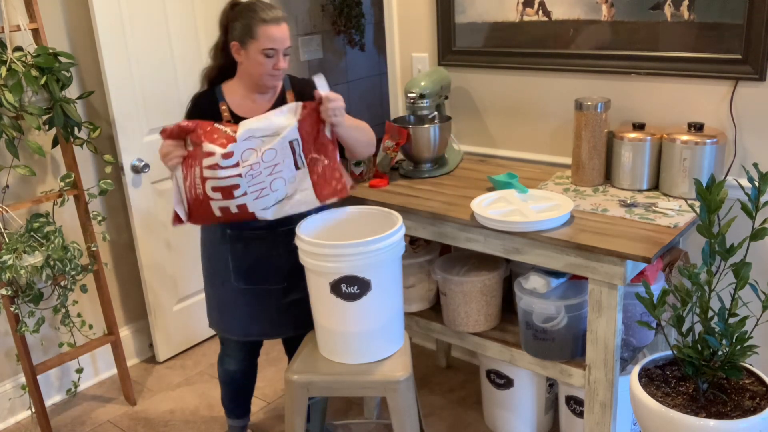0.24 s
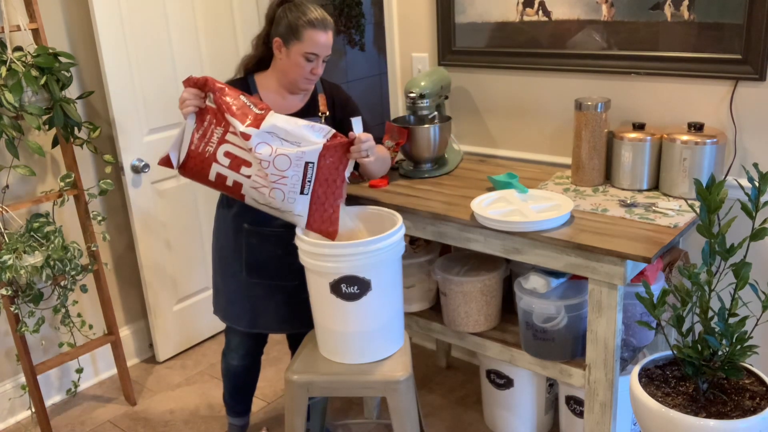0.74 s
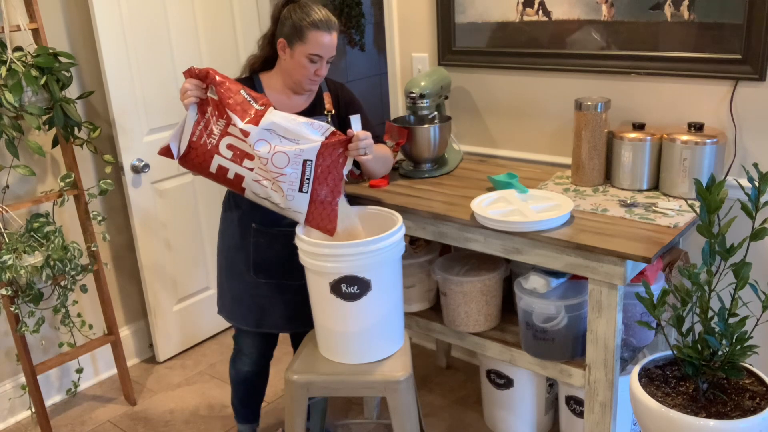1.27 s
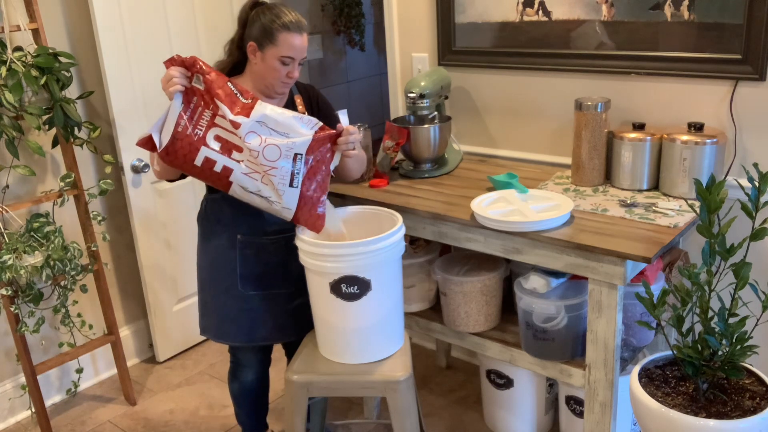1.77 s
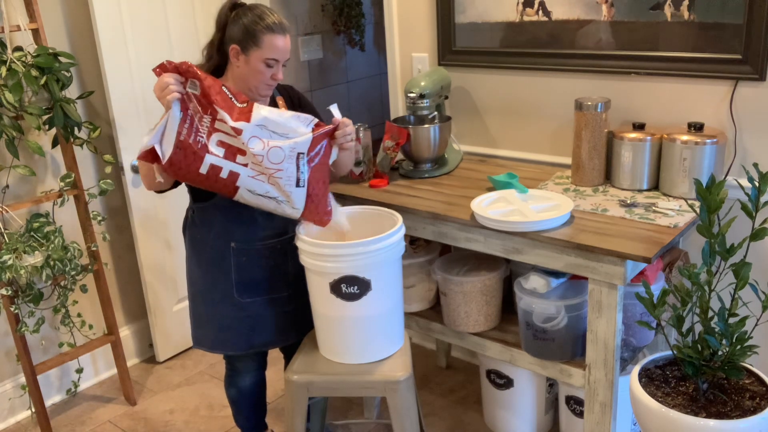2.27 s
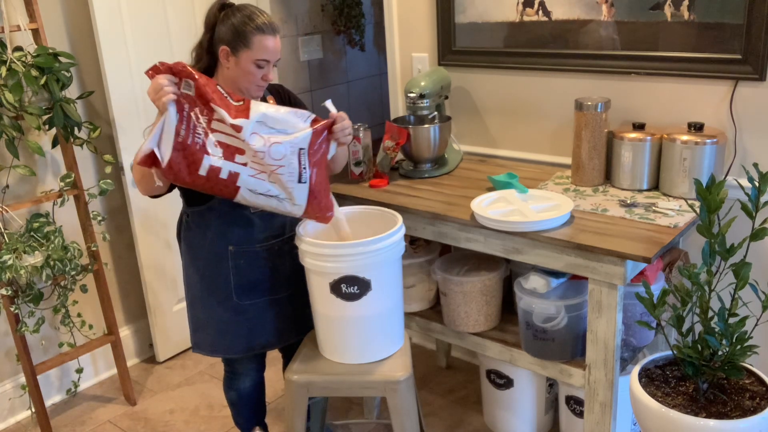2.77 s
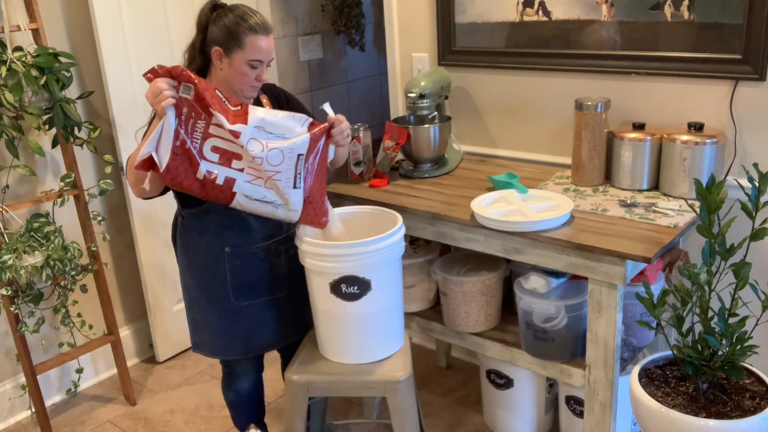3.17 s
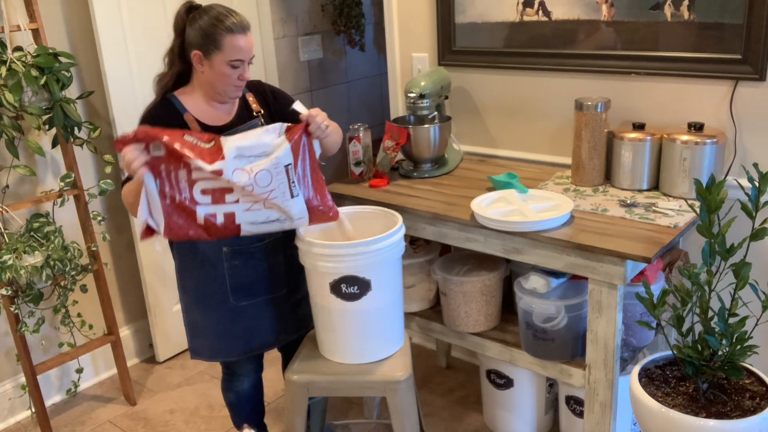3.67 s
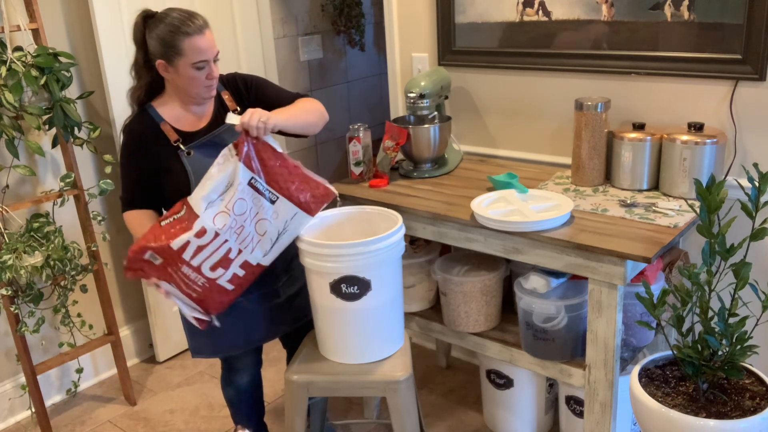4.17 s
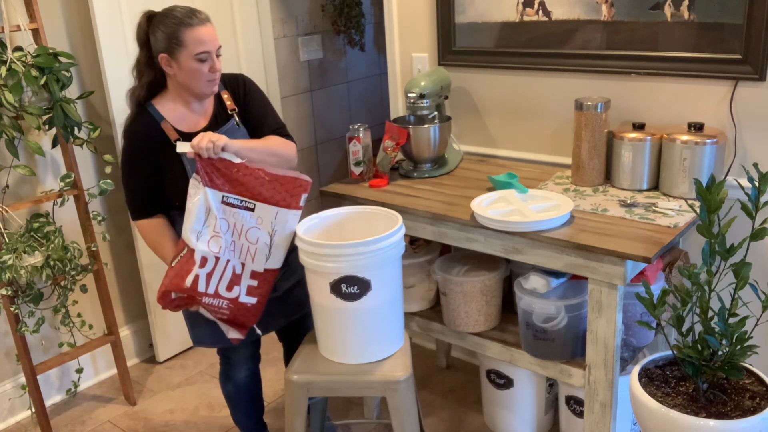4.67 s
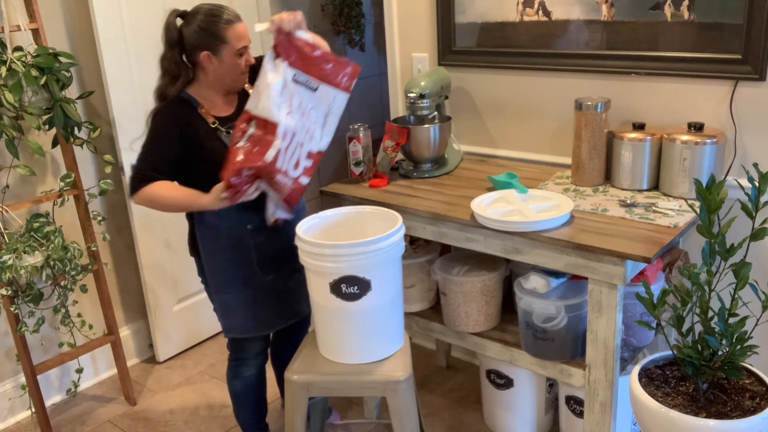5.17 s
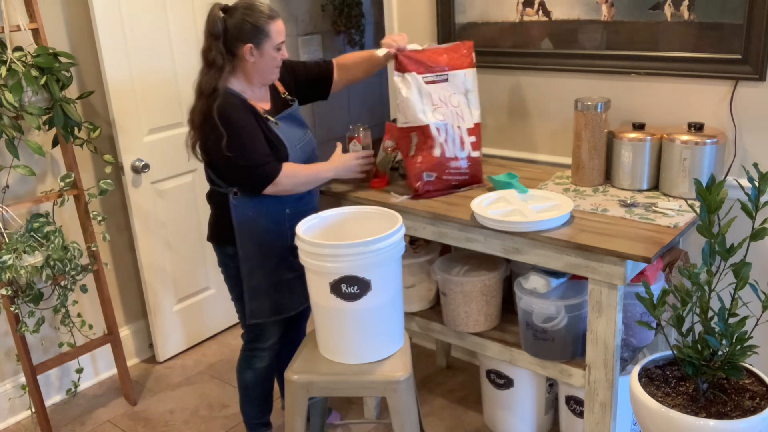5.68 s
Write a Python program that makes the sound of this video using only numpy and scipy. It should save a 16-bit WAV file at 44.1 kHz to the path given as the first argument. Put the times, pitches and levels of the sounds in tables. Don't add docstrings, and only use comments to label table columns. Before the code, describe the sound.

Over a soft low hum of kitchen appliances, a big bag of dry rice shifts with grainy slumps and crinkles. Rice bursts into a bucket with a hollow, ringing hiss that fades, followed by repeated shakes about four per second. Then the bag is righted with strong rustling and sharp plastic snaps, moves with faint creaks and crackles, and lands softly on a counter. Close, fairly dry stereo.

```python
import sys
import numpy as np
from scipy import signal
from scipy.fft import rfft, irfft, next_fast_len
from scipy.io import wavfile

SR = 44100
rng = np.random.default_rng(int(sys.argv[2]) if len(sys.argv) > 2 else 0)


def ratio(d):
    e = np.asarray(d, float) / 20
    return 10 ** e


def generate_wav(sig):
    pcm = np.round(np.clip(np.atleast_2d(sig).T, -1, 1) * 32767).astype(np.int16)
    wavfile.write(sys.argv[1], SR, pcm)


N = 261204

# (time [s], hiss level [dB])
FLOW = [(0, -65), (.685, -56), (.708, -36), (.75, -34.5), (.93, -37.5), (1.126, -41.5), (1.18, -46),
        (1.28, -45), (1.41, -49.5), (1.69, -53), (1.96, -51.5), (2.75, -52.5), (3.25, -53), (3.5, -44),
        (3.63, -43), (3.72, -54.5), (3.8, -70), (5.92, -70)]


def from_db(db):
    return np.exp(np.asarray(db) * np.log(10) / 20)


def rms_one(x):
    return x / np.sqrt(np.mean(x ** 2) + 1e-20)


def in_time(rows):
    s, *columns = np.transpose(rows)
    return [np.interp(np.arange(N) / SR, s, column) for column in columns]


def at_hz(points, hz):
    table_hz, values = np.transpose(points)
    return np.interp(np.log(hz), np.log(table_hz), values)


def flicker(depth_db, rate):
    step = 64
    r = np.exp(-2 * np.pi * rate * step / SR)
    noise = rng.standard_normal(N // step + 1002)
    slow = signal.lfilter([1], [1, -2 * r, r * r], noise)[1000:]
    return np.interp(np.arange(N) / step, np.arange(len(slow)), from_db(depth_db * rms_one(slow)))


def resonance(x, hz, width_hz):
    r = np.exp(-np.pi * width_hz / SR)
    poles = [1, -2 * r * np.cos(2 * np.pi * hz / SR), r * r]
    return signal.lfilter([(1 - r * r) / 2, 0, (r * r - 1) / 2], poles, x)


def grains(per_s, spread_db, clump_db):
    draw = rng.random((2, N))
    loudness_db = spread_db * np.minimum(rng.exponential(1, N), 5)
    sizes = from_db(loudness_db) * rng.standard_normal(N)
    born = draw < per_s * flicker(clump_db, 25) / SR
    return rms_one(np.array([sizes, sizes[::-1]]) * born + 1e-9)


def coloured(white, spectrum, patchy_db, patch_rate):
    edges = 25 * 2 ** np.arange(0, 9.6, .5)
    out = 0
    for k, (low, high) in enumerate(zip(edges, edges[1:])):
        if spectrum[0][0] < high and low < spectrum[-1][0]:
            band = signal.sosfilt(signal.butter(2, [low, high], "band", fs=SR, output="sos"), white)
            gain = from_db(at_hz(spectrum, np.sqrt(low * high)))
            gain = gain * (-1) ** k
            out = out + gain * flicker(patchy_db, patch_rate) * flicker(1.17, 28.0) * band
    return rms_one(out)


def layer(level_db, spectrum, per_s, spread_db, clump_db, patchy_db):
    return from_db(level_db) * coloured(grains(per_s, spread_db, clump_db), spectrum, patchy_db, 8.5)


def swells(peak_s, level_db, rise_s, fall_s, hold_s, under_db):
    t, power = np.arange(0, N + 32, 32) / SR, 1e-12
    for s, db, rise, fall, hold in np.broadcast(peak_s, level_db, rise_s, fall_s, hold_s):
        before = np.maximum(s - t, 0) / max(rise, 1e-3)
        after = np.maximum(t - s - hold, 0) / max(fall, 1e-3)
        power = power + from_db(2 * (db - 10 * (before + after)))
    return 10 * np.log10(np.interp(np.arange(N) / SR, t, power) + from_db(2 * under_db))


def handling():
    # (peak [s], rustle [dB], 10 dB rise [s], 10 dB fall [s], spilled grains [dB])
    shakes = [
        (1.508, -38, 0.02, 0.07, -47),
        (1.772, -37.5, .045, 0.09, -40.5),
        (2.033, -34, .04, .09, -40.5),
        (2.279, -34, .035, .2, -42.5),
        (2.549, -32.5, 0.06, 0.1, -43.5),
        (2.802, -29, .018, .11, -39),
        (3.063, -29.5, .022, 0.1, -39.5),
        (3.318, -29, .022, 0.12, -41),
    ]
    # (peak [s], slumping rice [dB], 10 dB rise [s], 10 dB fall [s], body over slump [dB])
    shifts_tipped = [(0.0, -27, .01, 0.04, -11), (.04, -34.5, 0.4, .1, -3), (.2, -36.5, .08, .1, -3.5),
                     (.3, -32.5, .07, .25, -1), (.53, -26.5, 0.14, 0.11, -6.5), (.64, -34, 0.02, 0.08, -2),
                     (.76, -41, .05, .25, -6), (1.2, -46.5, -0.2, .08, -2), (1.52, -41, 0, 0.05, -5),
                     (1.6, -54, 0, 0.1, 6.5), (1.702, -37, .002, .015, -14), (2.185, -43, 0.1, .03, -6),
                     (2.47, -39.5, .1, .04, -9), (2.671, -40.5, 0.12, 0.1, -4),
                     (2.875, -37, .015, .03, -14), (2.986, -37, .03, 0, -11), (3.122, -35, 0, 0.05, -10),
                     (3.17, -41, 0, 0.14, -9), (3.5, -44.5, 0.26, -0.1, -1.5)]
    shifts_righted = [(3.728, -34, .002, .01, -11), (3.762, -32, 0, 0.1, -8), (3.82, -26, .03, 0.15, -3),
                      (4.15, -27, 0.02, 0.06, -11.5), (4.18, -24, 0.0626, 0.13, -10),
                      (4.345, -33.5, 0.04, .08, -5), (4.55, -41, 0.35, 0.4, -6.5),
                      (4.703, -36, 0.08, .15, -2), (4.78, -35.5, 0.09, .03, 3),
                      (4.869, -39.5, 0.07, .07, -.1), (4.99, -39, 0.13, .04, -11),
                      (5.03, -40.5, .02, .02, 3), (5.08, -40.5, .025, 0.05, 5.5), (5.1, -41, 0.1, .04, -9),
                      (5.18, -42, .12, .045, -0.5), (5.21, -43, 0.15, .04, -7), (5.26, -45, 0.2, .02, -11),
                      (5.32, -46, 0.4, 0, -20), (5.405, -47, .02, 0.5, -18), (5.455, -36.5, .018, 0.3, -4),
                      (5.525, -35, .05, .015, -8), (5.555, -25.5, 0.0064, .05, -13),
                      (5.59, -39, 0.03, .04, -1), (5.695, -30, .1, .06, -1), (5.76, -38, .04, .1, -1),
                      (5.839, -36, 0.03, 0.2, -2.5)]
    # (peak [s], rustle [dB], 10 dB rise [s], 10 dB fall [s], loose grains over rustle [dB])
    grips = [(0.0, -29, .01, .015, -6), (.04, -32, 0.7, .13, -14), (.3, -33.5, 0.2, 0.5, -17),
             (.53, -32.5, 0.35, 0.28, -15), (.66, -37, 0.1, 0.04, -11), (1.701, -37, .002, .012, -12),
             (2.878, -35.5, 0.03, .03, -12), (2.984, -38, .004, 0.05, -12), (3.122, -35.5, 0, 0.06, -15),
             (3.762, -33.5, .004, .05, -12), (3.827, -27, .05, 0.11, -13.5), (4.06, -37.5, 0.2, 0.16, -8),
             (4.173, -24.5, 0.065, .15, -19), (4.333, -28, 0.01, .025, -10), (4.37, -30.5, .01, .05, -8),
             (4.47, -34.5, 0.23, 0.57, -18), (4.7, -38, 0.25, 0.1, -10.5), (4.949, -44, -0.13, 0.1, -7),
             (4.99, -43, -0.1, 0.06, -25), (5.08, -40.5, .04, .09, -11), (5.208, -37.5, -0.02, 0.05, -3),
             (5.258, -44, -0.1, 0.1, -16), (5.284, -34.5, .003, .018, -14), (5.33, -46.5, -0.1, .1, -17),
             (5.41, -46, -0.2, .03, -20), (5.452, -37, -0.02, .3, -16), (5.52, -34, .04, .02, -18),
             (5.555, -29, .004, .05, -18), (5.66, -26.5, .055, 0.09, -10.5), (5.839, -33, 0.03, .05, -15)]
    spill_fall = 0.68

    flow_db, = in_time(FLOW)
    s, sheet_db, rise, fall, spill_db = np.transpose(shakes)
    load_db = -38.5 + 0.8 * (sheet_db + 32.5)
    hold = 0.61 * fall
    body_db = swells(s + 0.011, load_db - 7.5, rise, fall, hold, flow_db - 14)
    slump_db = swells(s - 0.0093, load_db, rise, 0.64 * fall, hold, flow_db - 6)
    rustle_db = swells(s, sheet_db, rise, fall, 0, flow_db + 2.5)
    hiss_db = swells(s, spill_db, rise, spill_fall * fall, 0, flow_db)

    s, load_db, rise, fall, deep_db = np.vstack([shifts_tipped, shifts_righted]).T
    body_db = swells(s, load_db + deep_db, rise, fall, 0, body_db)
    slump_db = swells(s, load_db, rise, fall, 0, slump_db)

    s, sheet_db, rise, fall, loose_db = np.transpose(grips)
    rustle_db = swells(s, sheet_db, rise, fall, 0, rustle_db)
    hiss_db = swells(s, sheet_db + loose_db, rise, spill_fall * fall, 0, hiss_db)
    return body_db, slump_db, rustle_db, hiss_db


def rice_and_sack():
    # (frequency [Hz], level [dB per Hz])
    body_spectrum = [(110, -16), (170, -10), (240, -3.5), (310, 1.5), (400, -2.5), (600, -16.5)]
    slump_spectrum = [(250, -23), (450, -5), (800, 0.5), (1200, -3.5), (1700, -2), (3000, -26)]
    rustle_spectrum = [(900, -12), (1600, 0), (2400, -5.5), (3100, -1.5), (5000, -10), (7000, -10.5),
                       (11000, -23)]
    hiss_spectrum = [(2500, -9.5), (5000, -5), (7500, -2), (9000, -2), (11500, -2), (14000, -1.5),
                     (16500, 0.5)]
    # (frequency [Hz], width [Hz], gain [dB])
    sack_modes = [(242, 17, -7.5), (315, 18, -5.5), (522, 29, -7), (804, 26, -6), (1208, 52, -9),
                  (1485, 40, -9)]

    body_db, slump_db, rustle_db, hiss_db = handling()
    body = layer(body_db + 0.2, body_spectrum, per_s=4000, spread_db=1.6, clump_db=1.07, patchy_db=1.5)
    slump = layer(slump_db + 1.95, slump_spectrum, per_s=8000, spread_db=1.6, clump_db=.9, patchy_db=2.1)
    rustle = layer(rustle_db + 2.0, rustle_spectrum, per_s=8000, spread_db=2.4, clump_db=.9, patchy_db=1.5)
    hiss = layer(hiss_db + 6.0, hiss_spectrum, per_s=19000, spread_db=1.5, clump_db=2.0, patchy_db=2.1)
    sack = body + slump + rustle
    rung = 0
    for hz, width_hz, gain_db in sack_modes:
        rung = rung + from_db(gain_db) * flicker(3.3, 4.7) * resonance(sack, hz, width_hz)
    return sack + rung + hiss


def kitchen_air():
    # (frequency [Hz], level [dB per Hz])
    floor_spectrum = [(25, -17), (38, -9), (70, -1.5), (100, -3), (200, -14), (500, -19), (2000, -14.5),
                      (5000, -20), (8000, -37), (16000, -35)]
    return from_db(-46) * coloured(rng.standard_normal((2, N)), floor_spectrum, 1.4, 2.5)


def hum():
    # (time [s], frequency [Hz], level [dB])
    compressor = [(0, 76, -41.5), (1.5, 76, -42), (2.7, 76, -43.5), (3.3, 76, -50), (4.2, 75.8, -56),
                  (5.0, 75.8, -47.5), (5.92, 75.5, -53)]
    # (time [s], frequency [Hz], level [dB], second harmonic [dB])
    fan = [(0, 57, -52, -55), (1, 57.5, -50, -54), (2, 59, -57, -65), (2.9, 60.5, -46, -56),
           (3.5, 62.5, -46.5, -60), (4.5, 65, -47, -59), (5.3, 66, -49.5, -58.5), (5.92, 68.5, -47.5, -55)]

    hz, level_db = in_time(compressor)
    out = from_db(level_db) * flicker(2.0, 6.8) * np.sin(2 * np.pi * np.cumsum(hz) / SR)
    hz, first_db, second_db = in_time(fan)
    turn = 2 * np.pi * np.cumsum(hz * flicker(0.0796, 3.0)) / SR
    out += from_db(first_db) * flicker(2.4, 4.8) * np.sin(turn)
    out += from_db(second_db) * flicker(4.4, 3.1) * np.sin(2 * turn)
    return np.sqrt(2) * out


def pockets():
    # (time [s], level [dB], frequency [Hz], 10 dB fall [s])
    drops = [(.032, -36, 311, -0.07), (.274, -34, 315, .05), (.32, -35, 296, -0.15), (.439, -37, 482, .03),
             (.502, -36.5, 525, 0.1), (.569, -32, 315, 0), (.53, -33, 1100, .05), (.62, -33, 315, 0),
             (.755, -41, 356, 0), (1.703, -36, 846, .012), (2.05, -40, 1450, .03), (2.53, -39, 1500, .04),
             (2.584, -40.5, 382, 0.13), (2.82, -38, 1800, 0), (2.865, -40, 392, .06),
             (3.06, -38, 1350, 0.07), (3.79, -32, 560, 0.08), (3.83, -32, 1100, 0.06),
             (3.87, -37, 330, .03), (4.124, -35, 245, 0.1), (4.15, -28, 1200, 0.11),
             (4.225, -34, 522, 0.02), (4.298, -34, 525, 0), (4.72, -37.5, 315, 0), (4.745, -33, 330, .03),
             (4.77, -33, 240, .03), (5.025, -38, 321, 0.06), (5.065, -37, 364, 0.02),
             (5.449, -39, 423, 0.1), (5.528, -38, 358, 0.2), (5.556, -28, 976, 0.15), (5.62, -38, 310, 0),
             (5.645, -32, 2090, -0.1), (5.685, -32, 700, .03), (5.702, -29, 315, .03),
             (5.837, -42, 313, .03)]
    lead_s, rise_s = .05, .003

    out, t = np.zeros((2, N + SR)), np.arange(SR // 3) / SR - lead_s
    for s, level_db, hz, fall in drops:
        width_hz = .2 * hz
        noise = rng.standard_normal((2, len(t)))
        ring = resonance(resonance(noise, hz, width_hz), hz, width_hz)
        steps = np.where(t < 0, -t / rise_s, t / max(fall, 1e-3))
        at = int(s * SR)
        spread = rms_one(ring + .3 * ring[::-1])
        out[:, at:at + len(t)] += from_db(level_db - 10 * steps) * spread
    return out[:, int(lead_s * SR):][:, :N]


def snaps():
    # (time [s], middle [dB], dull [dB], bright [dB])
    creases = [(0.6129, -19, -28, -38), (1.6985, -25, -22, -47), (2.7836, -27, -30, -41),
               (2.7982, -26, -34, -38), (2.809, -17, -33, -41), (3.0544, -21, -34, -35),
               (3.7264, -30, -22.5, -48), (3.7584, -24, -21, -50), (3.765, -29, -23, -45),
               (3.7878, -20, -18, -31.5), (4.3294, -7.5, -27, -27), (4.3364, -13, -36, -35),
               (4.3602, -23, -31, -29), (4.3774, -17, -34, -30), (4.9472, -25, -37, -39.5),
               (4.9878, -31, -39, -52), (5.0549, -29.5, -42, -40), (5.0923, -32, -32, -51),
               (5.1532, -30.5, -41, -57), (5.206, -18, -38, -35), (5.2808, -19, -30, -41),
               (5.379, -35, -40, -40), (5.4389, -27.5, -42, -51), (5.5557, -22, -13, -45),
               (5.5934, -18, -25, -41), (5.832, -17, -33, -44)]
    crackles = [(0.0746, -21, -34, -44), (0.1684, -29, -31, -48), (0.2373, -25, -30, -46),
                (0.5061, -20, -23, -41), (0.7092, -27, -32, -35), (1.0214, -29, -35, -37),
                (1.3244, -32, -38, -43), (1.5044, -27, -33, -45), (1.7724, -28, -33, -39),
                (1.9803, -33, -40, -43), (2.0074, -30, -35, -39), (2.0212, -26, -32, -40),
                (2.147, -32, -37, -47), (2.2354, -30, -38, -44), (2.2632, -23, -34, -38),
                (2.2836, -22, -32, -40), (2.4268, -30, -35, -44), (2.4534, -34, -32, -40),
                (2.4664, -32, -32, -43), (2.5131, -27, -32.5, -43), (2.532, -22, -31, -42),
                (2.5954, -27, -32, -45), (2.763, -28, -32, -39), (2.8224, -20, -28.5, -38),
                (2.8764, -30, -28, -44), (2.9815, -33, -34, -43), (3.0414, -26, -31, -36),
                (3.1184, -28, -28, -45), (3.2974, -25, -29.5, -38), (3.3123, -20, -29, -38),
                (3.3794, -23, -25, -43), (3.4968, -29, -36, -40), (3.6504, -34, -37, -46),
                (3.8076, -18, -22, -38), (4.1189, -23, -24, -36), (4.1464, -20, -18, -41),
                (4.2024, -18, -20, -41), (5.2514, -39, -36, -45), (5.3384, -37, -40, -59),
                (5.3974, -36, -39, -54), (5.4214, -30, -36, -57), (5.4479, -23, -30, -48),
                (5.5063, -24, -29, -41), (5.6364, -21, -26, -34)]
    # (frequency [Hz], level [dB], 60 dB decay [s])
    sheet_modes = [(873, -2, 0.018), (1500, -1.5, 0.0072), (2820, -1.5, 0.0016), (4530, 1, 0.0014),
                   (6300, -3.5, 0.0011), (8600, -2, 0.0012), (10100, 8.5, 0.00063), (14000, 3, 0.001)]
    late_s = .001
    kitchen_t60_s, kitchen_db = 0.13, -4.5

    lesser = np.add(crackles, [0, 0, 5, -5])
    s, middle_db, dull_db, bright_db = np.vstack([creases, lesser]).T
    at, out = np.round((s + late_s) * SR).astype(int), np.zeros(N)
    chance = rng.standard_normal((len(at), 8))
    for k, (hz, level_db, t60) in enumerate(sheet_modes):
        if hz < 2500:
            strength_db = dull_db - 3.0
        elif hz < 7500:
            strength_db = middle_db + 0.74
        else:
            strength_db = bright_db + 15.0
        clicks = np.zeros(N)
        clicks[at] = from_db(strength_db + level_db + 2.3 * chance[:, k]) * (-1) ** k
        r, w = from_db(-60 / (t60 * SR)), 2 * np.pi * hz / SR
        out += signal.lfilter([0, np.sin(w)], [1, -2 * r * np.cos(w), r * r], clicks + 1e-18)

    t = np.arange(SR // 4) / SR
    decay = from_db(-60 * t / kitchen_t60_s) * np.minimum(t / 0.0016, 1)
    tail = rng.standard_normal((2, len(t))) * decay
    tail *= from_db(kitchen_db) / np.sqrt(np.sum(tail[0] ** 2))
    return signal.fftconvolve(out[None], tail, axes=1)[:, :N] + out


def bucket_air():
    # (frequency [Hz], width [Hz], gain [dB])
    air_modes = [(3040, 200, -1), (1710, 300, -6)]
    # (time [s], gain [dB])
    air_fade = [(0, -8), (.75, -3), (.79, 4), (.95, 3), (1.03, 0), (1.12, 3), (1.23, -5), (1.45, -10),
                (3.4, -9), (3.52, 1), (3.62, 0), (3.7, -8), (5.92, -7)]

    stream_db, = in_time(np.add(FLOW, [.07, 18]))
    fade_db, = in_time(air_fade)
    drive = from_db(stream_db + fade_db) * flicker(2.0, 14.0) * rng.standard_normal((2, N))
    out = 0
    for hz, width_hz, gain_db in air_modes:
        out = out + from_db(gain_db) * resonance(resonance(drive, hz, width_hz), hz, width_hz)
    return out


def ports(pair, bearing):
    # (frequency [Hz], share of amplitude [0-1, larger values count as 1])
    common_share = [(30, 1.5), (80, 0.67), (150, 1.3), (300, 0.47), (700, 0.13), (2500, 0.27), (5000, 0.54),
                    (7000, 0.52), (7800, 0.93), (10000, 0.97), (11000, 0.42), (12000, .8), (12700, 1.5),
                    (16000, 1.5)]
    # (frequency [Hz], phase [rad])
    left_lead = [(100, -0.07), (3000, -0.36), (4500, 1.4), (6000, 1.68), (7200, 2.5), (7800, 3.0),
                 (10000, 3.3), (10600, 3.7), (11300, 4), (12000, 5.5), (12700, 6.5), (16000, 7)]
    # (frequency [Hz], level [dB])
    left_tilt = [(60, 1.4), (150, 4), (380, 2.4), (950, -1.0), (2380, -2.5), (5980, -0.7), (15000, 0.33)]

    size = next_fast_len(N + 2048)
    hz = np.maximum(np.arange(size // 2 + 1) * SR / size, 1)
    first, second = rfft(pair, size)
    common = np.clip(at_hz(common_share, hz), 0, 1)
    tilt = from_db(.5 * at_hz(left_tilt, hz))
    shift = np.exp(-1j * bearing * at_hz(left_lead, hz))
    right = common * shift * first + np.sqrt(1 - common ** 2) * second
    return irfft([first * tilt, right / tilt], size)[:, :N]


def scene():
    front = ports(rice_and_sack() + bucket_air() + kitchen_air(), bearing=0.99)
    drones = ports(pockets(), bearing=0.9)
    creases = ports(snaps(), bearing=0.8)
    return front + creases + hum() + drones


def roll_off(x):
    return signal.sosfilt(signal.butter(12, 16680, fs=SR, output="sos"), x)


def record(dry):
    low_pass = signal.cheby2(14, 60, 16150, fs=SR, output="sos")
    cut = signal.sosfilt(low_pass, dry)
    return roll_off(cut)


dry = scene()
out = record(dry)
generate_wav(out)
```